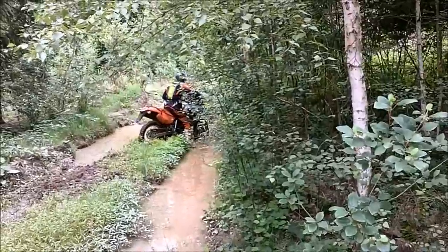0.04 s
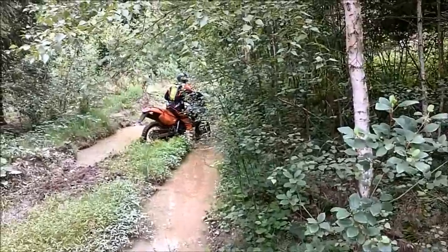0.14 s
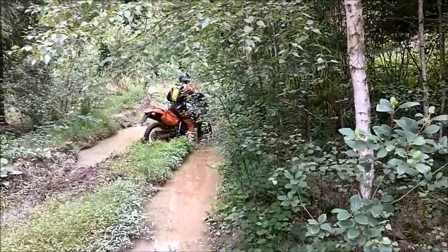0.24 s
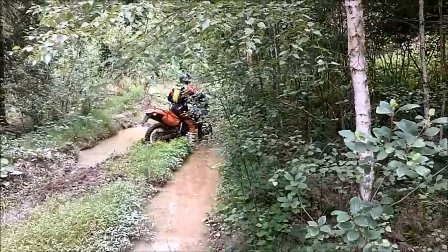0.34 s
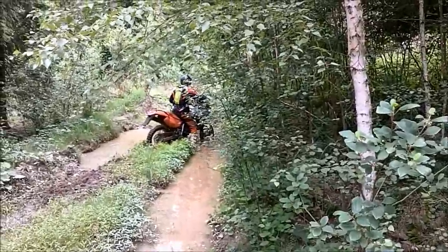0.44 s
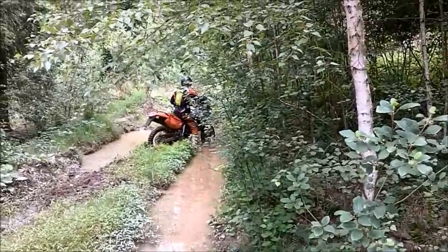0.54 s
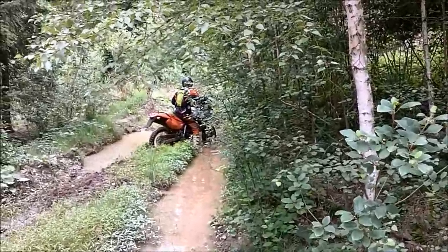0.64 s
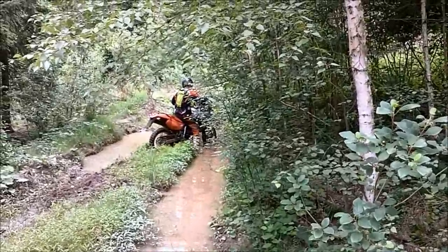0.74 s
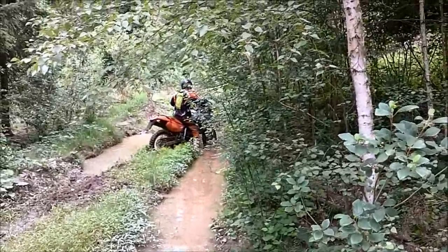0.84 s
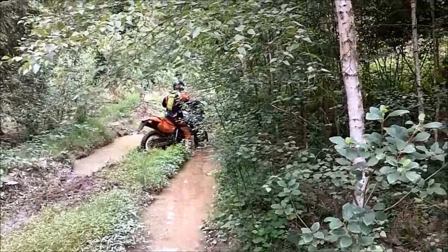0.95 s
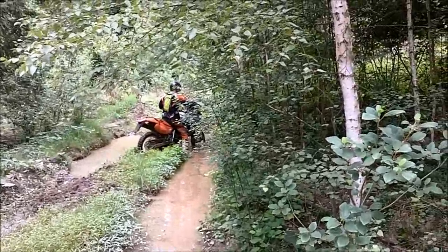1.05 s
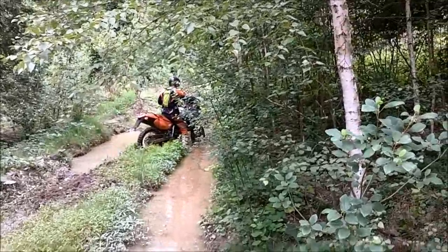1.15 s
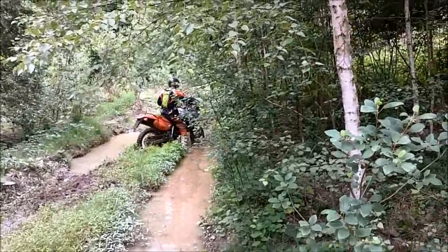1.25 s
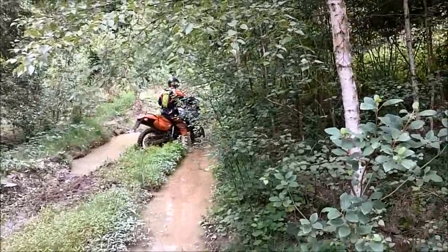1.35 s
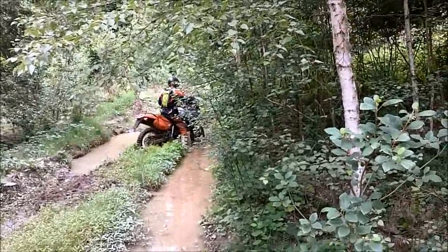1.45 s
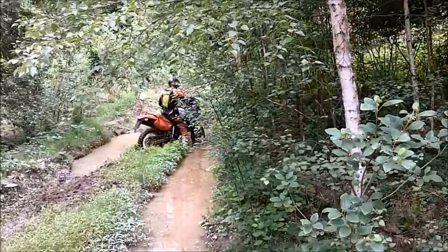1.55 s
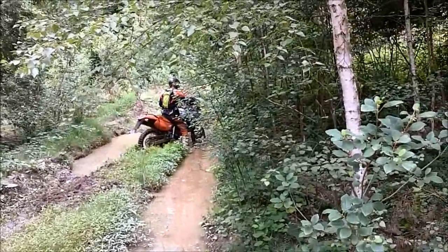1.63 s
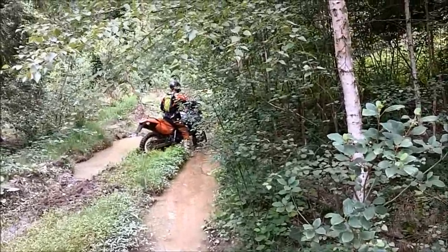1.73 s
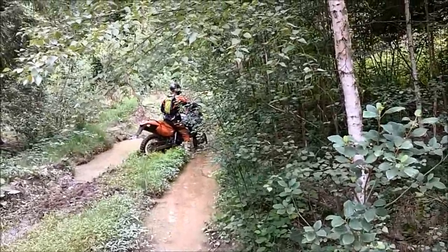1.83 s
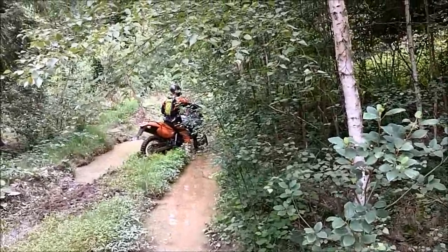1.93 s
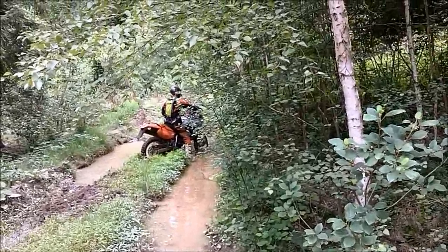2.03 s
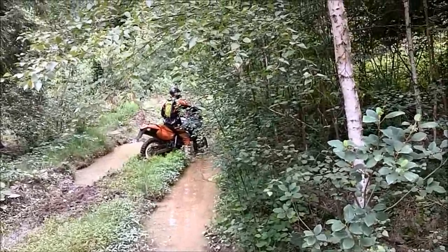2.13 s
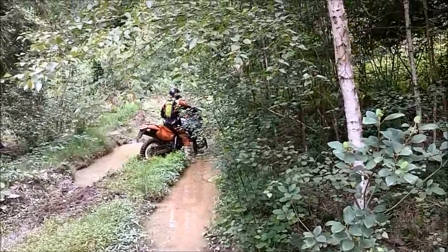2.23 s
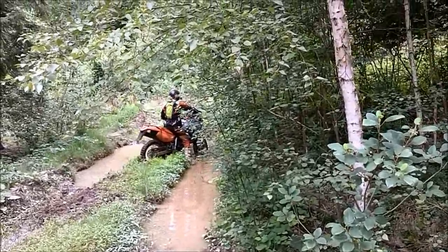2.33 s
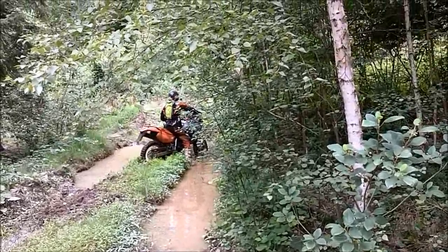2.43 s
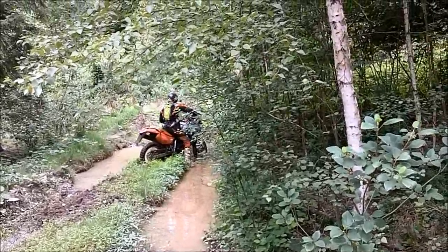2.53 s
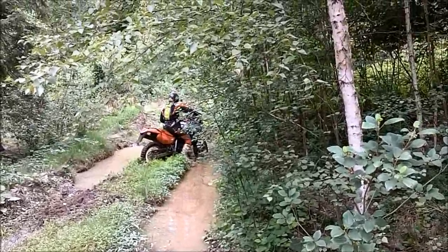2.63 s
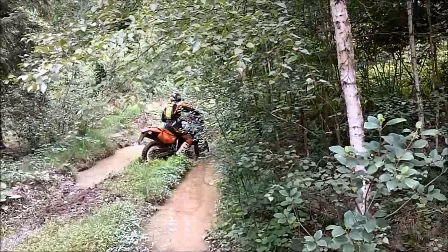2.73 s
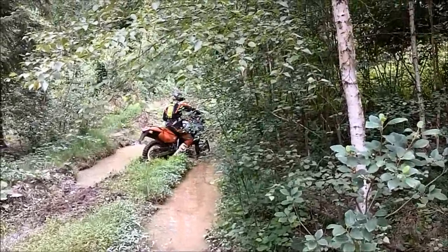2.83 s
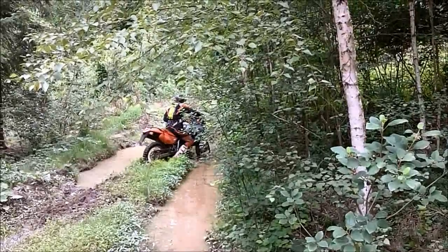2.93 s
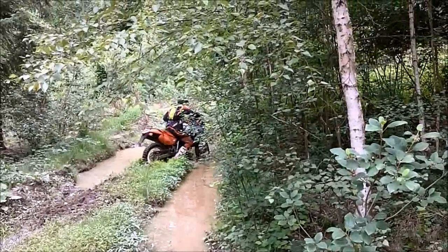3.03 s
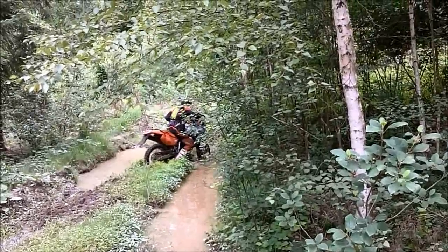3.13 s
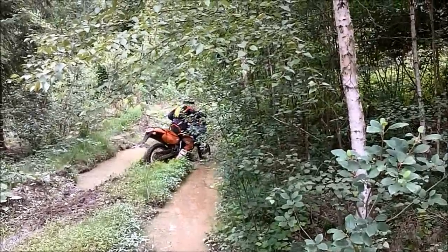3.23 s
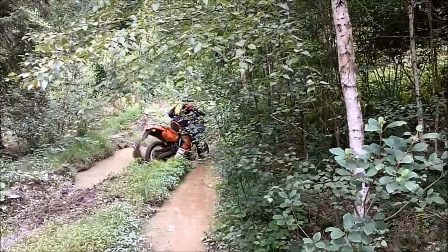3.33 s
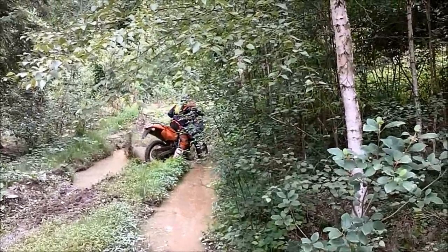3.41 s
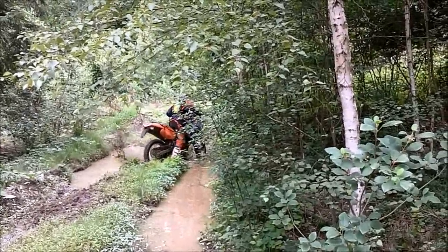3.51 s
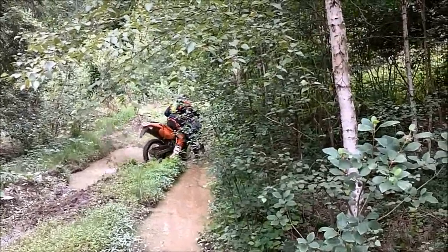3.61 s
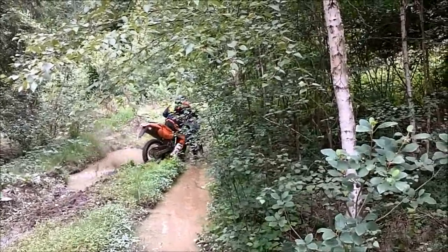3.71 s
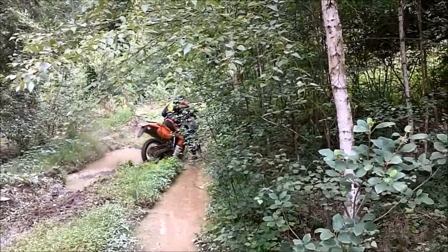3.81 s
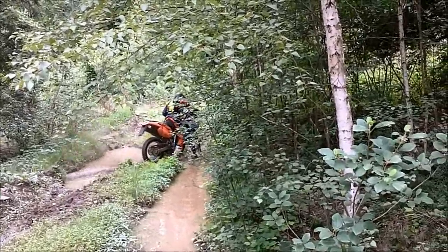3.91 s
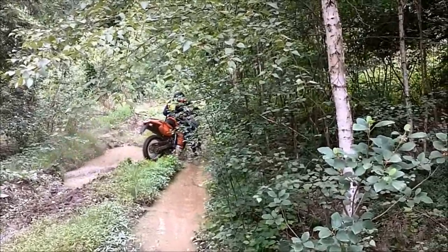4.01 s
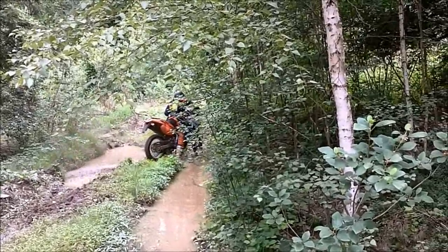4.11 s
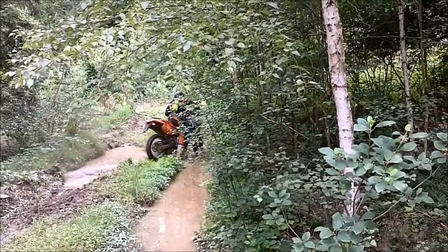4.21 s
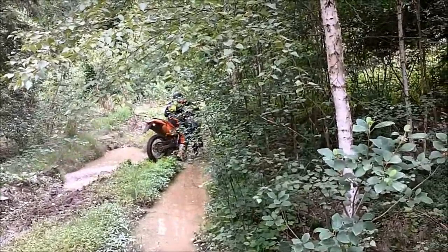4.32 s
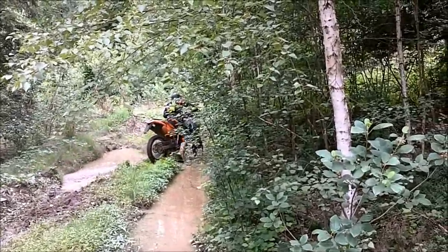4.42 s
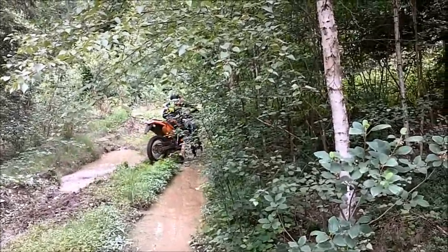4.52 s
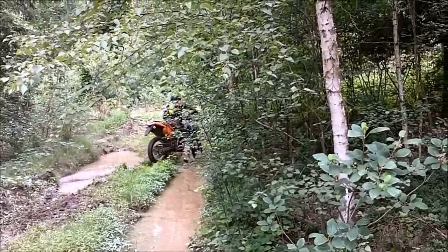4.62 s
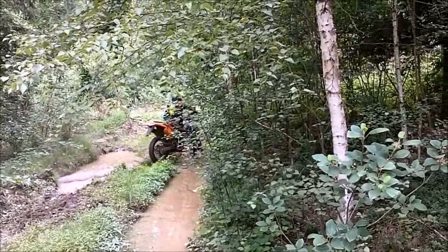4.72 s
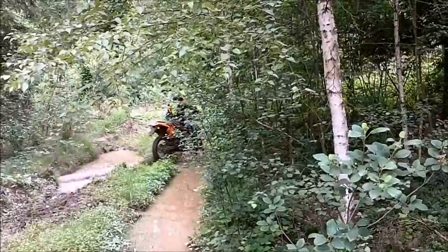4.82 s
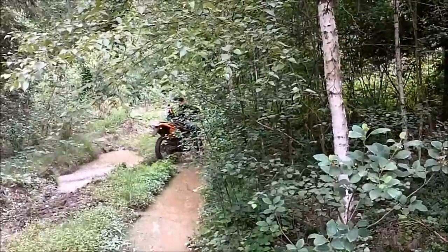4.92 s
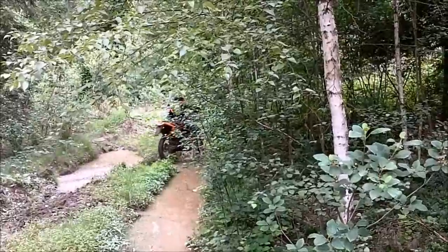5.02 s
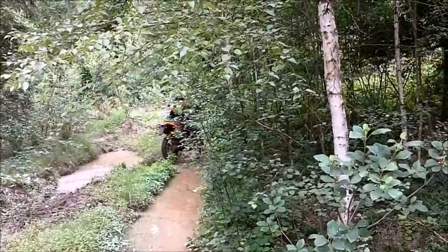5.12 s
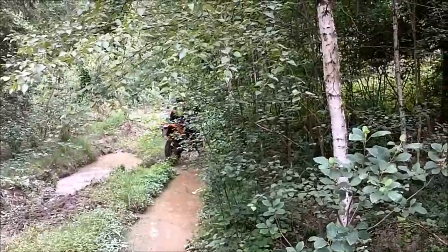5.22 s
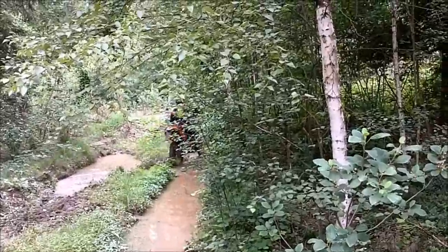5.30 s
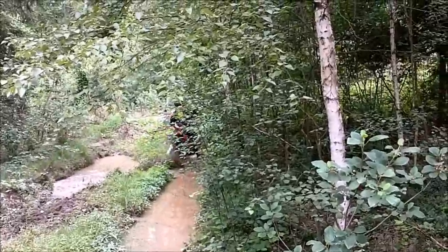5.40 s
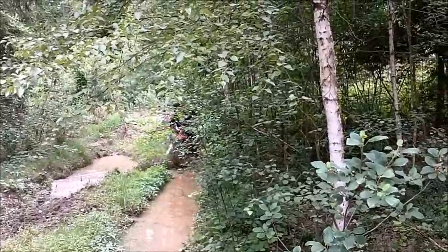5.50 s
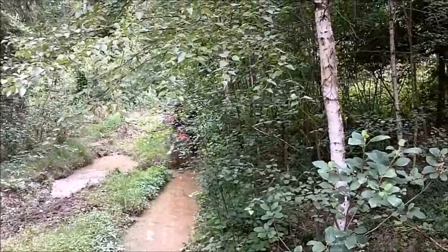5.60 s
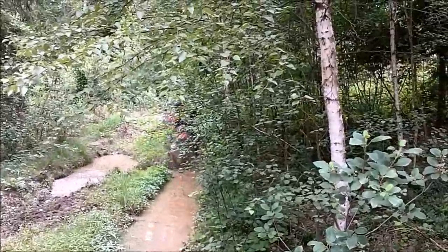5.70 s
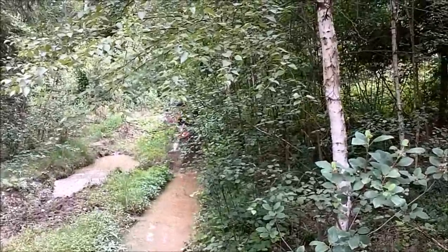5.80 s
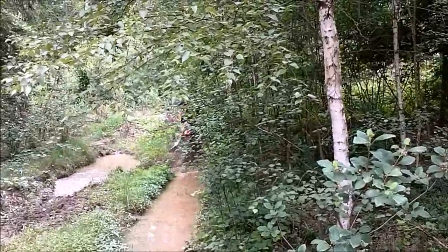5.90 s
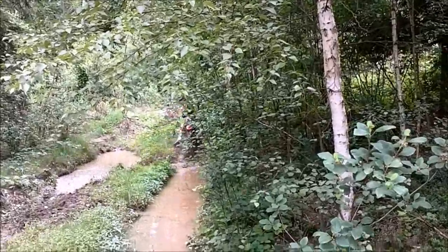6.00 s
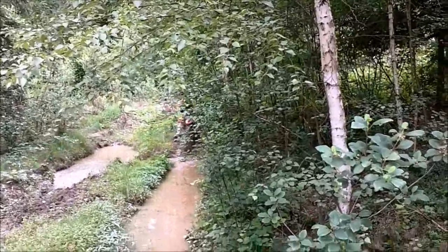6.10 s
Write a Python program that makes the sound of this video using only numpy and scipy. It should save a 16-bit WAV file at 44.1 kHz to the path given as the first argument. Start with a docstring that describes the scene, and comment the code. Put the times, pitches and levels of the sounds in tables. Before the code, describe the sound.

Single-cylinder off-road motorcycle heard from a distance on a wooded track, with a simple, band-limited microphone. First only faint rustling, then a half-second grinding starter whir that bogs down twice. The engine catches, chugging low and uneven, with metallic valve rattle. A quick blip, some stutter, a long throttle pull rising into a buzzing bark, a slight fall under load, then throttle off, dull pops and low thudding.

```python
"""A single-cylinder dirt bike stands stalled on a muddy forest track, some way off; leaves rustle faintly.
The starter's gears whine and grind, sagging over two compressions, until the engine coughs, catches and idles.
The throttle blips, pulls long, eases, pulls again and shuts with dull pops, leaving the engine at low revs.
Speed and throttle tables time and shape each firing: filtered puffs thump through pipe and silencer,
noise bursts rasp and hiss, noise-fed steel modes rattle, and a diffuse noise tail is the trees' scatter."""
import sys
import numpy as np
from scipy import signal
from scipy.fft import rfft, irfft, next_fast_len
from scipy.io import wavfile
from scipy.ndimage import uniform_filter1d, map_coordinates

SR = 44100
rng = np.random.default_rng(int(sys.argv[2]) if len(sys.argv) > 2 else 0)


def log_audio(samples):
    """Write samples as a 16-bit WAV file to the path given in sys.argv[1]."""
    # one column per channel
    frames = np.atleast_2d(samples).T
    # limit to full scale, then quantise
    limited = np.clip(frames, -1, 1)
    pcm = np.round(limited * 32767).astype(np.int16)
    wavfile.write(sys.argv[1], SR, pcm)


N = 271215

# engine speed from the first firing on: t/s, firing rate/Hz
ENGINE_SPEED = [(1.609, 9.19), (1.73, 13.56), (2.07, 12.52), (2.23, 12.1), (2.305, 20.39), (2.4, 32.84),
                (2.68, 28.18), (2.78, 32.69), (2.98, 30.16), (3.08, 36.35), (3.32, 26.94), (3.65, 46.63),
                (3.87, 55.82), (4.18, 61.59), (4.68, 51.82), (5.15, 40.74), (5.39, 42.38), (5.57, 41.25),
                (5.9, 28.1), (5.92, 24), (6.15, 22.37)]
# rider's hand (blip, long pull, easing as the wheel spins, second pull): t/s, throttle opening/0-1
THROTTLE_HAND = [(2.25, 0.34), (2.31, 0.72), (2.36, 0.93), (2.49, 0.47), (2.66, 0.41), (2.85, 0.44),
                 (2.93, 0.33), (3.07, 0.65), (3.22, 0.89), (3.58, 0.85), (3.85, 0.36), (4.3, 0.2),
                 (4.65, 0.51), (5.22, 0.82), (5.46, .85), (5.66, 0.62), (5.86, .08), (5.95, 0.31)]
CRUISE_RATE_HZ = 30  # reference firing rate
PUFF_DB = 16.5  # exhaust puff at cruise rate, throttle shut
STARTER_ON_S, STARTER_OFF_S = 1.083, 1.56


def amp(db):
    """Amplitude ratio of a level in dB."""
    return 10 ** (np.asarray(db) / 20)


def unit(x):
    """x scaled to rms 1."""
    return x / np.sqrt(np.mean(x ** 2) + 1e-20)


def along(points, hz):
    """Read (f/Hz, value) points on a log frequency axis."""
    f, v = np.transpose(points)
    return np.interp(np.log(hz + 1), np.log(f + 1), v)


def curves(rows, at=None):
    """Each column after the first, read per sample or at given values of the first."""
    s, *cols = np.transpose(rows)
    at = np.arange(N) / SR if at is None else at
    return [np.interp(at, s, c) for c in cols]


def wobble(rate_hz):
    """Smooth random curve with rate_hz random knots a second."""
    knots = rng.standard_normal(int(N * rate_hz / SR) + 4)
    return map_coordinates(knots, [np.arange(N) * rate_hz / SR])


def filtered(x, response):
    """x times a response of frequency."""
    size = next_fast_len(N + SR // 2)
    return irfft(rfft(x, size) * response(np.fft.rfftfreq(size, 1 / SR)), size)[:N]


def noise(spectrum):
    """Noise of rms 1, coloured by (f/Hz, level/dB) points."""
    return unit(filtered(rng.standard_normal(N), lambda hz: amp(along(spectrum, hz))))


def resonances(modes, f):
    """Causal response of parallel (f/Hz, width/Hz, level/dB) modes."""
    return sum(amp(db) * 1j * f * w / (c * c - f * f + 1j * f * w) for c, w, db in modes)


def ticks(times, sizes):
    """Impulses at the given times."""
    return np.bincount(np.round(times * SR).astype(int), sizes, N)[:N]


def fading(x, t60_s):
    """Each impulse of x becomes an exponential decay with its onset smoothed over 2 ms."""
    swell = np.hanning(SR // 500)
    decay = signal.lfilter([1], [1, -amp(-60 / (t60_s * SR))], x)
    return np.convolve(decay, swell / swell.sum(), "same")


def effort(at, throttle_db, octave_db):
    """dB gained at full throttle opening, and per octave of speed above the cruise rate."""
    octaves = np.log2(curves(ENGINE_SPEED, at)[0] / CRUISE_RATE_HZ)
    return throttle_db * curves(THROTTLE_HAND, at)[0] + octave_db * octaves


def leaves():
    """Faint rustle: coloured noise swaying randomly in level."""
    # rustle spectrum: f/Hz, level/dB
    rustle = [(20, 15), (60, 5), (200, -0.5), (700, -1.5), (1700, -3), (2500, -5), (4100, 2.5),
              (5000, -4.5), (5600, -15.5), (8000, -22), (10000, -22.5), (15000, -25)]
    level_db, sway_db = -62, 2.1
    return noise(rustle) * amp(level_db + sway_db * wobble(15.9))


def trees(x):
    """Trunks and leaves scatter a short diffuse tail, its decay time set by frequency."""
    # decay of the scatter: f/Hz, t60/s
    decay_times = [(100, 0.83), (1000, 0.38), (5000, 0.12), (12000, 0.17)]
    hz, t, z = signal.stft(rng.standard_normal(SR // 2), SR, nperseg=256)
    decay = amp(-60 * t / along(decay_times, hz)[:, None])
    tail = signal.istft(z * decay, SR, nperseg=256)[1]
    return signal.fftconvolve(x, tail / np.linalg.norm(tail))[:N]


def steel(ring):
    """Dense rattle of engine parts, partly ringing in the cases; rms 1."""
    # steel resonances: f/Hz, width/Hz, level/dB
    case_modes = [(540, 89, -10), (937, 41, 1.5), (1215, 12, 6), (1628, 75, 4), (3410, 240, 3),
                  (3806, 150, 3), (4660, 24, 5), (4600, 43, 4), (10200, 140, -32)]
    # rattle spectrum: f/Hz, level/dB
    metal = [(80, -10), (300, -11), (700, -1), (1700, 2.5), (3000, 4), (4000, 6), (4950, 3), (5300, -10),
             (6200, -50), (8000, -36), (9700, -13.5), (12000, -30), (15000, -32)]
    case = lambda f: resonances(case_modes, f) / (1 + (f / 10500) ** 8)
    ringing = unit(filtered(rng.standard_normal(N), case))
    return unit(noise(metal) + ring * ringing)


def mechanics():
    """Valve gear rattles once the starter lets go, louder with speed; starter drive and gearbox clack."""
    # valve gear and chain: firing rate/Hz, level/dB
    clatter = [(12, -46), (23, -42), (31, -40.5), (60, -37)]
    # clacks of the starter drive and gearbox: t/s, level/dB, t60/s
    clacks = [(1.084, -43, 0.093), (1.411, -33.5, 0.068), (1.547, -30, 0.18), (2.233, -37, 0.05),
              (2.303, -31, 0.078), (5.686, -31.5, 0.02)]
    let_go = np.arange(N) / SR > STARTER_OFF_S
    level = amp(curves(clatter, curves(ENGINE_SPEED)[0])[0]) * let_go
    rattle = level * unit(amp(1.2 * wobble(160))) * steel(ring=0.41)
    blows = sum(fading(ticks(np.array([s]), [amp(db)]), t60) for s, db, t60 in clacks)
    return rattle + blows * steel(ring=0.72)


def starter():
    """The gears spin up, whine and grind, dropping in pitch and level over each compression."""
    # compressions that bog the starter down: t/s, length/s
    compressions = [(1.377, .075), (1.513, .085)]
    spin_up_s = .09
    gear_hz, rise_hz, sag_hz = 1200, 563, 170  # at speed, gained in spin-up, lost under load
    level_db, rise_db, sag_db = -37.5, 13, 12  # same three terms
    t = np.arange(N) / SR
    lag = np.exp(-np.maximum(t - STARTER_ON_S, 0) / spin_up_s)
    load = sum(np.exp(-(2 * (t - s) / length) ** 4) for s, length in compressions)
    whine_hz = gear_hz - rise_hz * lag - sag_hz * load
    db = level_db - rise_db * lag - sag_db * load
    turn = 2 * np.pi * np.cumsum(whine_hz * (1 + .018 * wobble(150))) / SR
    # the teeth only sing while pressed together
    pressed = np.interp(db, [-50, -40], [0, 1])
    whine = pressed * (.48 * np.sin(turn) + .28 * np.sin(3 * turn))
    grind = steel(ring=.75) * unit(amp(2 * wobble(250)))
    running = (t > STARTER_ON_S) * (t < STARTER_OFF_S)
    return running * amp(db) * (whine + .9 * grind)


def firings():
    """A weak cough, then one combustion per engine cycle: rows of (t/s, level/dB, throttle)."""
    # weak puff just before the engine catches: t/s, level/dB
    cough = [(1.549, 2)]
    # dull afterburn pops: t/s, level over a plain firing/dB
    pops = [(2.479, 4.5), (2.509, 5), (2.575, 3.5), (2.61, 3.5), (2.84, 4.5), (2.87, 3.5), (5.685, 8),
            (5.742, 6.5), (5.771, 8), (5.801, 6.5)]
    uneven_db = 1.1  # scatter scale at cruise rate; more when slower
    pop_sharpness = 0.52  # share of its throttle value that a pop keeps
    t = np.arange(ENGINE_SPEED[0][0], N / SR, 1 / SR)
    cycles = np.cumsum(curves(ENGINE_SPEED, t)[0]) / SR
    times = np.interp(np.arange(int(cycles[-1]) + 1), cycles, t)
    slowness = CRUISE_RATE_HZ / curves(ENGINE_SPEED, times)[0]
    scatter_db = uneven_db * slowness * rng.uniform(-1.7, 1, len(times))
    db = PUFF_DB + effort(times, throttle_db=8.5, octave_db=1) + scatter_db
    throttle = curves(THROTTLE_HAND, times)[0]
    for s, extra_db in pops:
        nearest = np.argmin(np.abs(times - s))
        db[nearest] += extra_db
        throttle[nearest] *= pop_sharpness
    return np.vstack([(*cough[0], 0), np.column_stack([times, db, throttle])])


def steady(x):
    """x evened out by its running rms over 1/6 s."""
    return x / np.sqrt(np.abs(uniform_filter1d(x ** 2, size=SR // 6)) + 1e-6)


def rasp(fired):
    """Turbulent gas bursts with every firing; at speed the repeated shocks add a buzz of high harmonics."""
    # gas bark, pipe-wall and hiss spectra: f/Hz, level/dB
    bark_spectrum = [(100, -40), (300, -2), (520, -1.5), (720, -4.5), (1100, -4), (1900, 1.5),
                     (2600, -14.5), (3400, -17), (6000, -60)]
    wall_spectrum = [(250, -27), (350, 12), (430, -10.5), (520, 6.5), (650, -16), (850, 1), (1100, -1),
                     (1500, 0), (2300, 4.5), (3000, -23), (6000, -71)]
    hiss_spectrum = [(1500, -17), (2700, -2.5), (3400, -2), (4300, 2.5), (4950, -1), (5250, -11.5),
                     (6000, -17.5), (7200, -25), (9800, -26), (12000, -34.5), (15000, -43)]
    # ringing of the pipe wall: f/Hz, width/Hz, level/dB
    wall_modes = [(1097, 61, 2), (1550, 70, 0), (1920, 35, -10)]
    # the rasp needs gas flow: firing rate/Hz, share/0-1
    onset = [(14, 0.2), (22, 0.93)]
    level_db = -45 + effort(None, throttle_db=9, octave_db=6.5)
    hiss_db = -3 + effort(None, throttle_db=5, octave_db=7)  # relative to the rasp
    speed = curves(ENGINE_SPEED)[0]
    running = curves(onset, speed)[0] * (np.arange(N) / SR > ENGINE_SPEED[0][0])
    times, db, throttle = fired.T

    # strong firings on an open throttle spit hardest
    shock_db = 0.53 * (db - PUFF_DB) + 2.6 * throttle + rng.normal(0, 1.0, len(times))
    shocks = ticks(times, amp(shock_db))
    gate = steady(fading(shocks, t60_s=.115) + .3 * fading(shocks, t60_s=.015))
    # at speed the bursts merge into a continuous flow
    flow = np.interp(speed, [28, 44], [.05, .5])
    bursts = flow + (1 - flow) * gate

    # every shock rings the pipe wall in the same way
    t = np.arange(SR // 30) / SR
    ring = filtered(noise(wall_spectrum), lambda f: 1 + resonances(wall_modes, f))[:len(t)]
    ring = ring * amp(-60 * t / .11) * signal.windows.tukey(len(t), .1)
    wall = signal.fftconvolve(shocks, ring)[:N]

    tonal = np.interp(speed, [30, 45, 60], [.12, .45, .65])
    bark = np.sqrt(1 - tonal) * bursts * noise(bark_spectrum) + np.sqrt(tonal) * steady(wall)
    hiss = bursts * noise(hiss_spectrum) * amp(hiss_db + 0.86 * wobble(25))
    return running * amp(level_db) * (bark + hiss)


def exhaust(fired, size=8192):
    """Valve puffs, sharper on open throttle, and softer piston pushes echo in the pipe and ring the silencer."""
    # silencer resonances: f/Hz, width/Hz, level/dB
    silencer_modes = [(59.6, 23, -10.5), (93.7, 36, -2), (175, 39, -17), (301, 83, -0.5), (404.8, 40, 4),
                      (504, 96, -3.5)]
    # puff bandwidth: at cruise rate with throttle shut, gain at full throttle, gain per octave of speed
    puff_hz, puff_throttle_hz, puff_octave_hz = 219, 151, 30.5
    # piston push against the puff: share, gain at full throttle, loss per octave of speed
    push_share, push_throttle, push_octave = 0.37, .55, 0.77
    push_hz = 280  # extra low-pass of the push
    # lag of the push: at cruise rate, its cap (reached at idle), power of speed that shortens it
    push_ms, push_longest_ms, push_follows = 6.35, 9.04, 0.87
    # the pipe's open end returns the bass inverted: round trip, share, bandwidth
    trip_ms, echo_share, echo_hz = 7.56, 0.55, 93
    # main chamber booms higher under load (open throttle, low speed) and weaker on open throttle
    chamber_hz, chamber_load_hz, chamber_width_hz = 105.1, 56, 27
    chamber_db, chamber_loss_db = 6, 7  # throttle shut, lost at full throttle

    f, lead = np.fft.rfftfreq(size, 1 / SR), size // 16
    out = np.zeros(N + size)
    delay = lambda ms: np.exp(-2j * np.pi * f * ms / 1000)
    # all-pass: the baffles smear each front over a fraction of a millisecond
    smear = (1 - 1j * f / 1100) / (1 + 1j * f / 1100)
    shell = resonances(silencer_modes, f)
    pipe = 1 / (1 + echo_share * delay(trip_ms) / (1 + (f / echo_hz) ** 2))
    fade = signal.windows.tukey(size, .1)
    for s, db, throttle in fired:
        revs = curves(ENGINE_SPEED, s)[0] / CRUISE_RATE_HZ
        octaves = np.log2(revs)
        width_hz = puff_hz + puff_throttle_hz * throttle + puff_octave_hz * octaves
        puff = 1 / (1 + (f / width_hz) ** 4)
        share = max(0, push_share + push_throttle * throttle - push_octave * octaves)
        lag_ms = min(push_ms / revs ** push_follows, push_longest_ms)
        push = share * puff * delay(lag_ms) / (1 + (f / push_hz) ** 2)
        load = throttle / max(revs, 1) ** 1.46
        boom_hz = chamber_hz + chamber_load_hz * load
        chamber = (boom_hz, chamber_width_hz, chamber_db - chamber_loss_db * throttle)
        silencer = smear * (shell + resonances([chamber], f))
        thump = np.roll(irfft((puff + push) * pipe * silencer), lead)
        out[round(s * SR) - lead:][:size] -= amp(db) * fade * thump
    return out[:N]


def scene():
    """The bike among the trees, over a faint rustle of leaves."""
    fired = firings()
    pipe = exhaust(fired)
    clamour = rasp(fired) + starter() + mechanics()
    # long waves pass the trunks, short ones scatter
    echo = trees(amp(-17) * pipe + amp(-10) * clamour)
    return (pipe + clamour + echo + leaves())[None]


def record(dry):
    """The microphone cancels a few narrow bands and keeps nothing above its band limit."""
    # microphone dips: f/Hz, half width/Hz
    mic_dips = [(2740, 427), (5500, 267), (7880, 1130), (10950, 500)]
    top_hz = 15200
    colour = lambda f: np.prod([np.abs(f - hz) / np.hypot(f - hz, width) for hz, width in mic_dips], axis=0)
    return filtered(dry[0], lambda f: colour(f) * (f < top_hz))[None]


dry = scene()
out = record(dry)
log_audio(out)
```